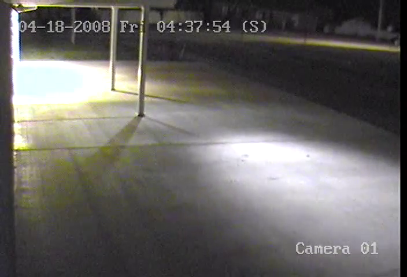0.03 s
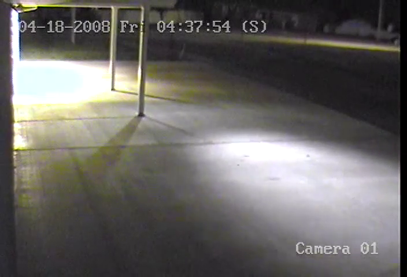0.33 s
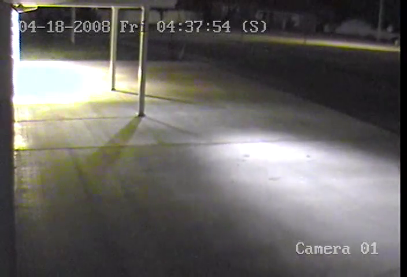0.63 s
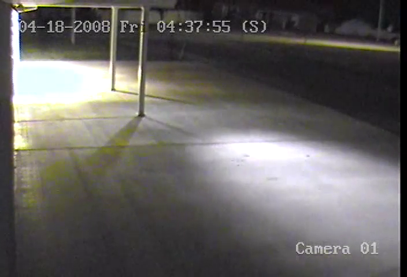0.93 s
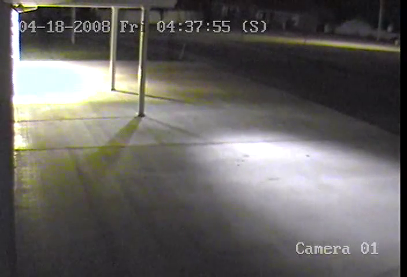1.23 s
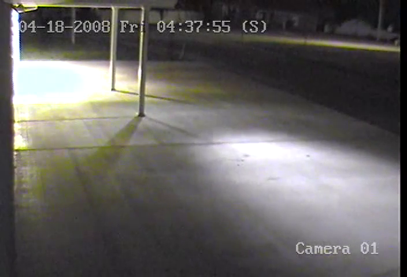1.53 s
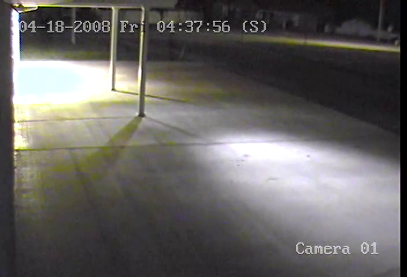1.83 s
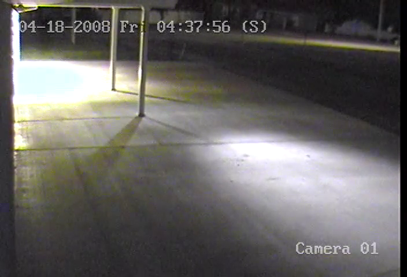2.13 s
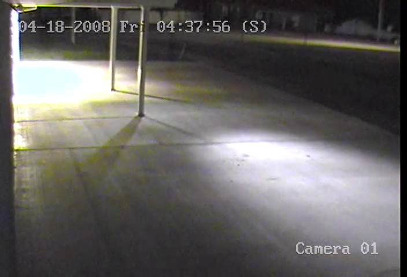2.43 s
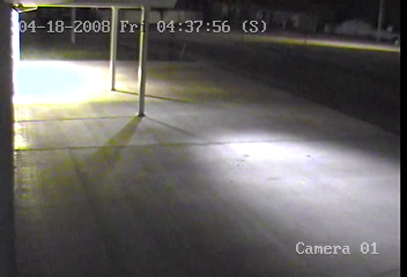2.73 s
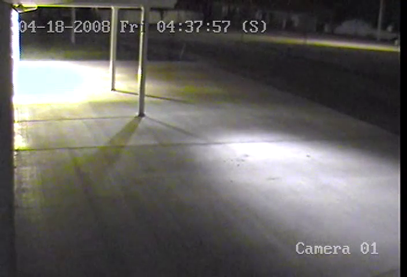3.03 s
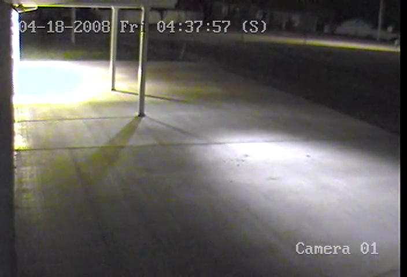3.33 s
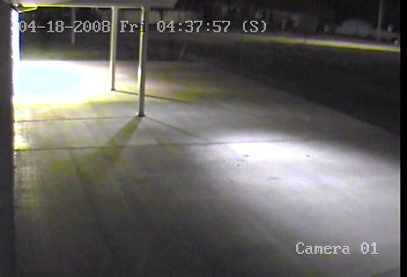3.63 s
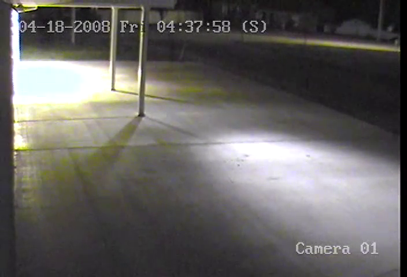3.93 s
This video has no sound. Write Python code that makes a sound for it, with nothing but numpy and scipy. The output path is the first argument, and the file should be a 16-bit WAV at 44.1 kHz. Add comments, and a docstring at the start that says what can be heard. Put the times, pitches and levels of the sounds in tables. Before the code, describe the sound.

Metal doors shake in an earthquake at night, banging amid droning panels and chattering loose parts. Halfway through, the shaking thins into separate, harder clanks with gritty rasps over ground rumble, heard through a small security microphone.

```python
"""An earthquake shakes metal doors at night, heard through a small security microphone. It opens with panels
droning and loose parts chattering without a break, under rasps, bangs and thuds. About halfway through, that
bed sinks and the shaking thins into separate bursts. In each, a gritty, rasping high hiss swells around the
bangs: first the frame clanks, then the panel booms. The hardest clanks come late, and the ground rumbles
underneath to the end."""
import sys
import numpy as np
from scipy import signal
from scipy.fft import rfft, irfft, next_fast_len
from scipy.io import wavfile
from scipy.ndimage import uniform_filter1d, map_coordinates

SR = 44100
rng = np.random.default_rng(int(sys.argv[2]) if len(sys.argv) > 2 else 0)


def generate_wav(sig):
    """Save sig (samples, or channels by samples) to the path in sys.argv[1] as 16-bit PCM at SR."""
    pcm = np.round(np.clip(np.atleast_2d(sig).T, -1, 1) * 32767).astype(np.int16)
    wavfile.write(sys.argv[1], SR, pcm)


N = 176400

# Cues and level rides. Levels are relative within each layer.
# doors hitting their frames: t/s, clank level/dB, boom level/dB, clank tilt/(dB per octave)
DOOR_HITS = [(0.009, -26, -24.5, 7), (0.073, -28.5, -28, -2), (.243, -27.5, -27, -5.5),
             (0.323, -45.5, -24, -24), (0.483, -30, -27.5, 3), (.672, -29, -34, 2), (.723, -31, -26, 2),
             (.918, -32, -24, 4), (1.034, -23, -44, 18), (1.098, -28, -24.5, 2.5), (1.167, -29, -30, 6),
             (1.262, -25.5, -38, 3), (1.319, -26.5, -25.5, 9), (1.502, -29.5, -26.5, 9.5),
             (1.695, -35, -31, 7), (1.762, -32.5, -27.5, 9), (1.815, -38, -36, 9), (1.864, -23, -32.5, 2),
             (1.962, -24, -31, 3), (2.026, -28.5, -39, -2), (2.094, -31, -35.5, -2), (2.23, -29, -33.5, 2),
             (2.273, -24.5, -42.5, 6.5), (2.337, -23.5, -34.5, 3), (2.402, -26.5, -32.5, 8.5),
             (2.446, -15.5, -35.5, 6), (2.607, -14, -30, -0.5), (2.664, -23, -31, 2.5),
             (2.806, -22, -32.5, 1), (2.882, -26, -31.5, 2.5), (3.0639, -18.5, -33.5, -5),
             (3.1079, -17.5, -29, 6), (3.2334, -18, -31.5, 2.5), (3.284, -26, -31, -0.5),
             (3.3362, -16, -33.5, 8), (3.517, -27, -32, -1.5), (3.555, -22, -31, -1.5),
             (3.8858, -21, -29.5, -2.5)]
# loose boards knocking: t/s, level/dB
BOARD_HITS = [(.725, -37.5), (1.961, -37.5), (2.025, -34.5), (2.097, -33), (2.229, -36.5)]
# bursts of gritty, rasping high hiss around the bangs: t/s, length/s, level/dB
RASP_STROKES = [(0, 0.12, -40.5), (0.15, 0.41, -43), (0.629, 0.19, -40.5), (0.904, 0.5, -41),
                (1.485, 0.058, -43), (1.665, 0.32, -41.5), (1.863, 0.026, -36), (1.996, 0.13, -46.5),
                (2.236, 0.23, -39), (2.318, 0.042, -39.5), (2.591, 0.11, -38), (2.79, 0.043, -37),
                (2.879, 0.034, -35), (3.043, 0.099, -40.5), (3.227, 0.14, -36.5), (3.503, 0.079, -40.5),
                (3.588, 0.058, -46.5), (3.862, 0.056, -44.5)]
# short squeals and ticks of metal on metal: t/s, f/Hz, level/dB, width/s
METAL_SQUEALS = [(.523, 5740, -29, .008), (1.028, 5680, -31, 0.0071), (2.145, 3250, -39, 0.004),
                 (2.883, 6680, -30, .004), (3.847, 2550, -36, 0.0026)]
# panels and walls flexing: t/s, f/Hz, level/dB
FLEX_THUDS = [(.315, 111.3, -43), (.35, 160, -38.5), (0.397, 314, -27.5), (.462, 295.6, -30),
              (.551, 298.5, -43), (0.625, 324, -28.5), (.665, 137.5, -44), (1.069, 290, -30),
              (1.186, 276.7, -31), (1.45, 87, -53), (1.579, 308.6, -31.5), (1.603, 291.4, -28.5),
              (2.368, 290, -27.5)]
# level ride of the panel drone: t/s, level/dB
DRONE_RIDE = [(0, -26.5), (.14, -35), (.33, -32), (.85, -37.5), (1.25, -33), (1.46, -41), (2.3, -41),
              (2.52, -48), (3.35, -46.5), (4, -50)]
# level ride of the chatter: t/s, level/dB
CHATTER_RIDE = [(0, -36), (.1, -34), (.14, -42), (.26, -34), (.5, -36.5), (.78, -39.5), (.85, -42.5),
                (1.0, -39), (1.3, -37.5), (1.44, -44.5), (1.53, -37), (1.64, -45), (1.9, -43),
                (2.17, -44.5), (2.5, -47.5), (4, -53.5)]

# ring of the door frame: f/Hz, bandwidth/Hz, level/dB
FRAME_MODES = [(676, 130, -10), (1400, 107, -2), (1505, 107, 4), (1751, 126, -7), (1931, 88, -4),
               (2846, 114, -2), (3392, 283, 2), (3750, 360, -3.5), (5340, 1070, -18.5)]
# broad resonances of the boards: f/Hz, bandwidth/Hz, level/dB
BOARD_MODES = [(663, 350, -2.5), (1004, 560, -7), (2220, 1200, -9.5)]
# low modes of a door panel: f/Hz, level/dB, decay/s
PANEL_MODES = [(264.2, -12.5, 0.032), (301.3, 0.5, 0.022), (362.2, -2.5, 0.015), (555.8, -19.5, 0.028)]

# EQ of the rasp's grit: f/Hz, level/dB
GRIT_EQ = [(500, -28), (1500, -9), (3700, -4), (5100, -5.5), (5630, 3), (6000, 0.5), (6450, -11.5),
           (7200, -15.5), (7450, -47.5), (10200, -49.5)]
# EQ of a loud rasp's harsh top: f/Hz, level/dB
HARSH_EQ = [(4000, -36.5), (6300, 4), (7250, 2), (7500, -60), (9000, -1), (10200, -25.5)]
# EQ of the humming panels: f/Hz, level/dB
DRONE_EQ = [(70, -54), (130, -27), (200, -15), (297, -0.5), (340, -6), (410, -8.5), (520, -50.5)]
# EQ of the rattling parts: f/Hz, level/dB
CHATTER_EQ = [(380, -31), (540, 4), (1150, 3), (1500, 8.5), (1680, 1.5), (2500, 0.5), (3950, 3), (4300, -4),
              (5500, 1.5), (7300, -28)]
# EQ of the ground and the distant rattling: f/Hz, level/dB
RUMBLE_EQ = [(25, -2.5), (150, -4), (300, 18), (480, 3.5), (680, -1.5), (1030, 5.5), (1500, 4.5),
             (2400, -4.5), (5500, -6.5), (7600, -26.5)]

CLANK_DB, CLANK_RISE_S, RING_SCATTER_DB, CRACK_DB = -4, 0.0012, 3, -16
GRAZE_DB, GRAZE_S, LEAD_S = -12, .009, .03  # the graze starts LEAD_S ahead of the strike
STRIKE_DB = -8.5  # the first hard contact, against the spurt that follows
SETTLE_S, SETTLE_AT_DB, SETTLE_HALVES_DB = .008, -21.5, 1  # a harder blow seats the door sooner
SETTLE_RANGE_S, KNOCK_SETTLE_S = (.004, .016), 0.013
BOOM_DB, BOOM_LAG_S, BOOM_RISE_S, BOOM_DETUNE = 2, 0.003146, 0.0096, 0.0508
RASP_RISE_S, RASP_FALL_S, RASP_WAVER_DB = 0.017, 0.0088, 1.6
HARSH_DB, HARSH_AT_DB = -3, -33  # harsh top against the grit, and the stroke level where that holds
THUD_CYCLES = 1.8  # a thud swells and fades within a few swings
HUM_DB, FAR_BOOM_DB, FAR_PITCH = -1.5, -3, (0.639, 1.3)  # pitch as a ratio to the near door
TREBLE_HZ, DULL_BELOW_DB, DULL_SLOPE = 2220, -39.5, 1.7  # slope: dB of treble cut per dB of chatter
CLINK_DB, CLINK_HZ, CLINK_DECAY_S = -7, (610.5, 3943), 0.014
RUMBLE_DB, ROOM_DB, ROOM_T60_S = -48.5, -10.5, 0.1


def bangs():
    """A door meets its frame: first the clank, then the boom. Loose boards knock as well."""
    out = np.zeros(N + SR)
    for s, clank_db, boom_db, tilt_db in DOOR_HITS:
        settle_s = SETTLE_S * 2 ** ((SETTLE_AT_DB - clank_db) / SETTLE_HALVES_DB)
        settle_s = np.clip(settle_s, *SETTLE_RANGE_S)
        add(out, s, amp(clank_db + CLANK_DB) * clank(FRAME_MODES, settle_s, tilt_db))
        pitch = 1 + BOOM_DETUNE * rng.standard_normal()
        add(out, s + LEAD_S + BOOM_LAG_S, amp(boom_db + BOOM_DB) * boom(pitch))
    for s, db in BOARD_HITS:
        add(out, s, amp(db) * clank(BOARD_MODES, KNOCK_SETTLE_S, tilt_db=0))
    return out[round(LEAD_S * SR):][:N]  # trim the lead so each strike lands on its cue


def clank(modes, decay_s, tilt_db):
    """A graze, a strike and a spurt of contacts ring the modes; the contact point tilts their balance."""
    t = np.arange(SR // 5) / SR - LEAD_S
    after = np.maximum(t, 0)
    spurt = (1 - np.exp(-after / CLANK_RISE_S)) * np.exp(-after / decay_s)
    graze = amp(GRAZE_DB) * np.exp(-np.abs(t) / GRAZE_S)
    envelope = spurt + graze
    strike = signal.unit_impulse(len(t), round(LEAD_S * SR))
    force = unit(envelope * contacts(per_s=9400, size=len(t))) + amp(STRIKE_DB) * unit(strike)
    octaves = np.clip(np.log2(np.array(modes)[:, 0] / TREBLE_HZ), -1, .5)
    ring = resonances(modes, amp(tilt_db * octaves + RING_SCATTER_DB * rng.standard_normal(len(modes))))
    crack = lambda f: amp(CRACK_DB) * f / np.hypot(f, 900) / (1 + (f / 6300) ** 14)  # broadband bite
    return unit(filtered(force, lambda f: ring(f) + crack(f))) * np.sqrt(np.mean(envelope ** 2))


def boom(pitch):
    """A door panel swells into a few low swings and dies away."""
    t = np.arange(SR // 5) / SR
    swings = sum(amp(db) * np.exp(-t / decay) * np.sin(2 * np.pi * hz * pitch * t + rng.normal(0, 1.0))
                 for hz, db, decay in PANEL_MODES)
    sound = swings * (1 - np.exp(-(t / BOOM_RISE_S) ** 2))
    return np.sqrt(2) * sound / np.abs(sound).max()


def rasps():
    """Bursts of gritty high hiss rise, hold and fall around the bangs; louder ones are brighter."""
    t, power = np.arange(N) / SR, np.zeros(N)
    for s, length, db in RASP_STROKES:
        attack = np.exp(-np.maximum(s - t, 0) / RASP_RISE_S)
        release = np.exp(-np.maximum(t - s - length, 0) / RASP_FALL_S)
        power += (amp(db) * attack * release) ** 2
    grit = patchy(coloured(contacts(per_s=21000, size=N), GRIT_EQ), depth_db=0.5)
    harsh = amp(HARSH_DB) * power / amp(HARSH_AT_DB) ** 2 * coloured(rng.standard_normal(N), HARSH_EQ)
    return np.sqrt(power) * amp(RASP_WAVER_DB * wobble(rate=29)) * (grit + harsh)


def squeals():
    """Metal rubs on metal in tiny, high, unsteady tones."""
    return swells(METAL_SQUEALS, waver_rad=2.2)


def thuds():
    """Panels and walls flex with a dull, soft-edged pulse."""
    return swells([(s, hz, db, THUD_CYCLES / hz) for s, hz, db in FLEX_THUDS], waver_rad=.5)


def drone():
    """Many panels hum together; single ones, large and small, boom out at random."""
    booms = np.zeros(N + SR)
    for when, pitch, strength in rng.random(size=(60, 3)):
        add(booms, when * N / SR, 2 * strength * boom(np.interp(pitch, [0, 1], FAR_PITCH)))
    hum = amp(HUM_DB + wobble(rate=10)) * coloured(contacts(per_s=900, size=N), DRONE_EQ)
    return amp(curve(DRONE_RIDE)) * (hum + amp(FAR_BOOM_DB) * booms[:N])


def chatter():
    """Loose parts rattle without a break, duller as the shaking eases."""
    level_db = curve(CHATTER_RIDE) + 1.26 * wobble(rate=45)
    rattle = patchy(coloured(contacts(per_s=2600, size=N), CHATTER_EQ), depth_db=4.5)
    parts = rattle + amp(CLINK_DB) * clinks()
    body = filtered(parts, lambda f: 1 / (1 + (f / TREBLE_HZ) ** 4))
    treble_db = DULL_SLOPE * np.minimum(level_db - DULL_BELOW_DB, 0)
    return amp(level_db) * (body + amp(treble_db) * (parts - body))


def clinks():
    """Small loose parts, each ringing briefly at its own pitch."""
    t, out = np.arange(SR // 16) / SR, np.zeros(N + SR)
    for when, pitch, strength in rng.random(size=(700, 3)):
        hz = np.interp(pitch, [0, 1], CLINK_HZ)
        add(out, when * N / SR, strength ** 2 * np.exp(-t / CLINK_DECAY_S) * np.sin(2 * np.pi * hz * t))
    return unit(filtered(out[:N], lambda f: 1 / (1 + (f / CLINK_HZ[1]) ** 10)))


def rumble():
    """The bed: ground rumble and a wash of distant rattling."""
    gain = amp(RUMBLE_DB + wobble(rate=11.0))
    return gain * patchy(coloured(rng.standard_normal(N), RUMBLE_EQ), depth_db=7.0)


def room(x):
    """Nearby walls answer with a tight reverb tail."""
    t = np.arange(SR // 2) / SR
    tail = rng.standard_normal(len(t)) * amp(-60 * t / ROOM_T60_S)
    return signal.fftconvolve(x, tail / np.linalg.norm(tail))[:N]


def swells(rows, waver_rad):
    """Brief wavering tones, each under a bell-shaped fade."""
    t, out = np.arange(N) / SR, np.zeros(N)
    for s, hz, db, width in rows:
        phase = 2 * np.pi * hz * t + waver_rad * wobble(rate=1.3 / width)
        out += np.sqrt(2) * amp(db) * np.exp(-.5 * ((t - s) / width) ** 2) * np.sin(phase)
    return out


def contacts(per_s, size):
    """Tiny impacts at random moments."""
    return rng.standard_normal(size) * (rng.random(size) < per_s / SR)


def resonances(modes, gains):
    """A bank of steep-sided resonators, as a frequency response."""
    return lambda f: sum(g * amp(db) * (1j * f * width / (hz * hz - f * f + 1j * f * width)) ** 2
                         for g, (hz, width, db) in zip(gains, modes))


def patchy(x, depth_db):
    """Bands flicker as different loose parts ring from moment to moment."""
    spectra = signal.stft(x, nperseg=1024)[2]
    flicker = uniform_filter1d(rng.standard_normal(spectra.shape), size=2, axis=0)  # smooth in frequency
    flicker = uniform_filter1d(flicker, size=7, axis=1)  # and in time
    return unit(signal.istft(spectra * amp(depth_db * unit(flicker)), nperseg=1024)[1][:N])


def coloured(x, eq):
    """x through an EQ curve, at rms 1."""
    f, db = np.transpose(eq)
    return unit(filtered(x, lambda hz: amp(np.interp(np.log(hz + 1), np.log(f), db))))


def filtered(x, response):
    """x through a frequency response."""
    size = next_fast_len(len(x) + 8192)
    return irfft(rfft(x, size) * response(np.fft.rfftfreq(size, 1 / SR)), size)[:len(x)]


def wobble(rate):
    """Smooth random modulation, rate knots a second."""
    return map_coordinates(rng.standard_normal(2048), [np.arange(N) * rate / SR], mode="wrap")


def curve(ride):
    """A level ride, drawn out to one value per sample."""
    return np.interp(np.arange(N) / SR, *np.transpose(ride))


def add(track, s, sound):
    """Mix a sound in at s seconds."""
    i = max(round(s * SR), 0)
    track[i:i + len(sound)] += sound


def amp(db):
    """Decibels to gain."""
    return 10 ** (np.asarray(db) / 20)


def unit(x):
    """Scale to rms 1."""
    return x / np.sqrt(np.mean(x ** 2) + 1e-20)


def scene():
    """The mono mix: squeals and bangs feed the room, the other layers stay dry."""
    squealing, flexing = squeals(), thuds()
    doors = bangs() + squealing
    return (doors + amp(ROOM_DB) * room(doors) + rasps() + drone() + chatter() + flexing + rumble())[None]


def record(dry):
    """The small microphone shelves the treble down and cuts off the very top."""
    shelf_hz, shelf_db, top_hz = [7200, 7400], [0, -7], 10200
    return filtered(dry[0], lambda hz: amp(np.interp(hz, shelf_hz, shelf_db)) * (hz < top_hz))[None]


dry = scene()
out = record(dry)
generate_wav(out)
```